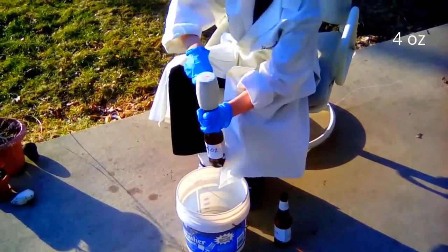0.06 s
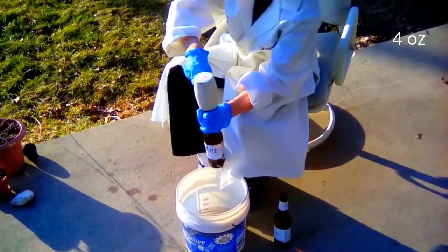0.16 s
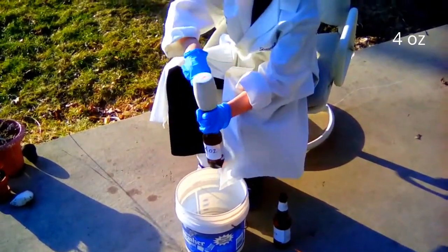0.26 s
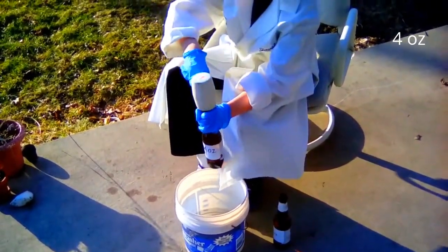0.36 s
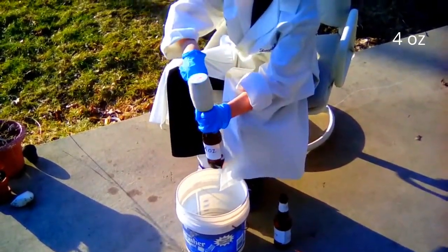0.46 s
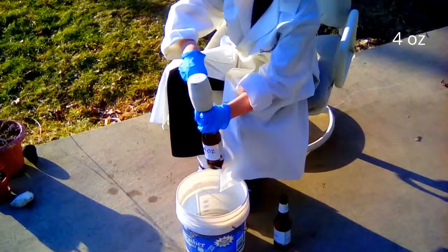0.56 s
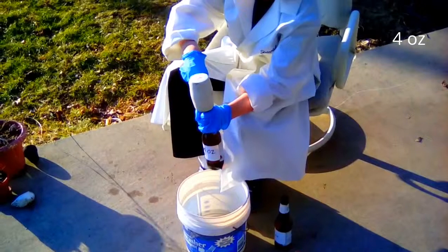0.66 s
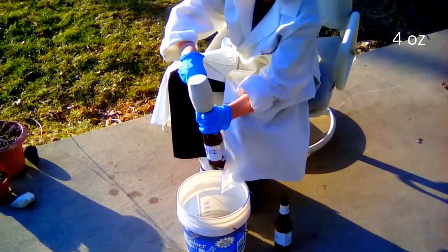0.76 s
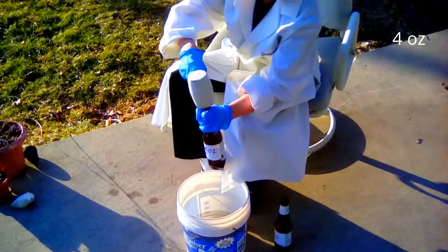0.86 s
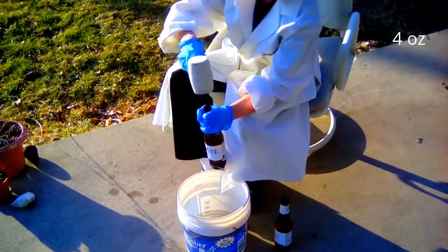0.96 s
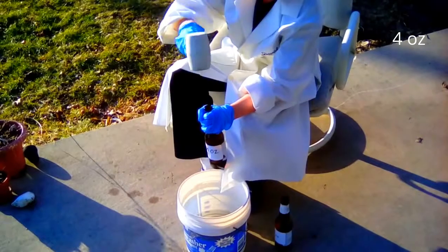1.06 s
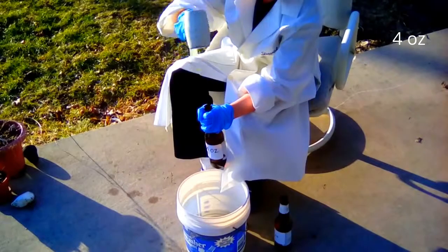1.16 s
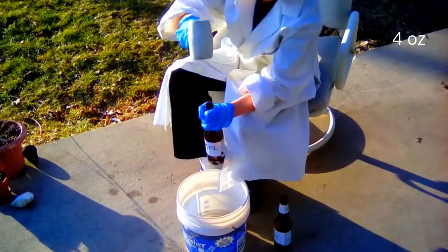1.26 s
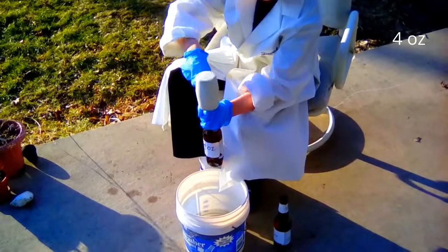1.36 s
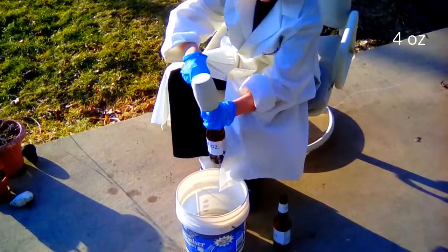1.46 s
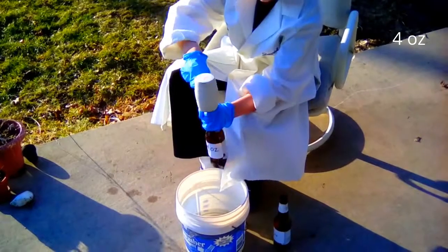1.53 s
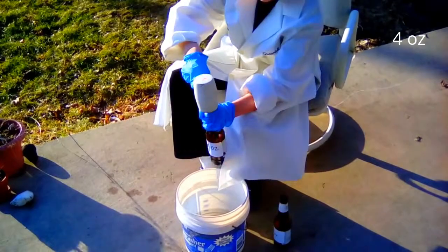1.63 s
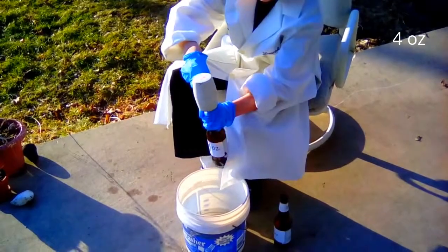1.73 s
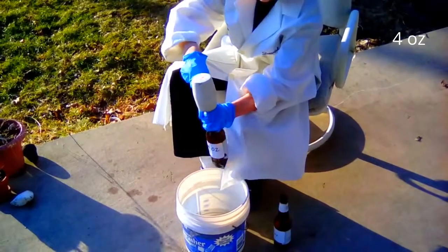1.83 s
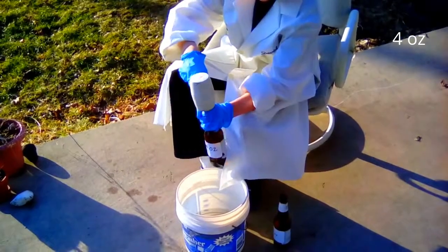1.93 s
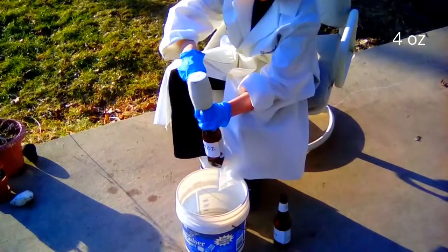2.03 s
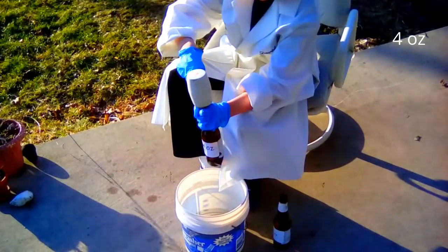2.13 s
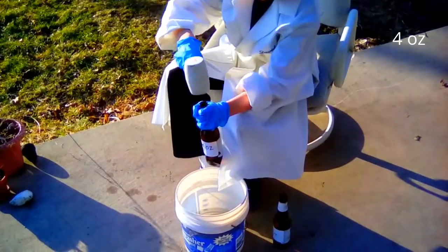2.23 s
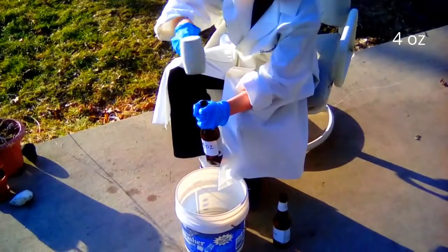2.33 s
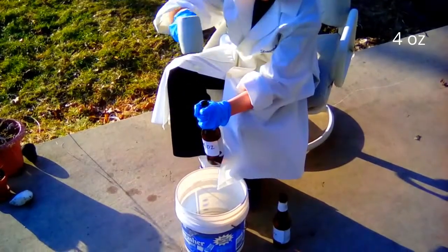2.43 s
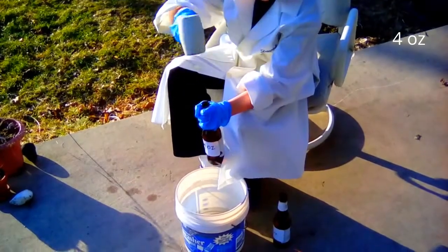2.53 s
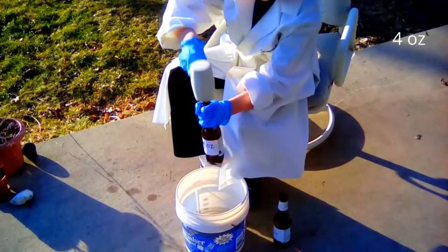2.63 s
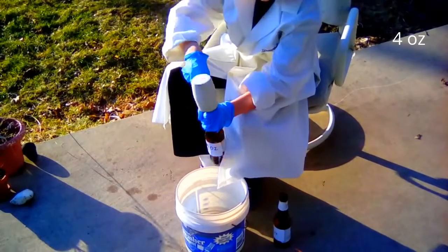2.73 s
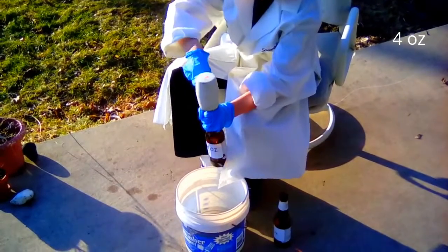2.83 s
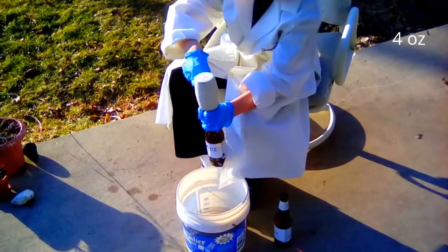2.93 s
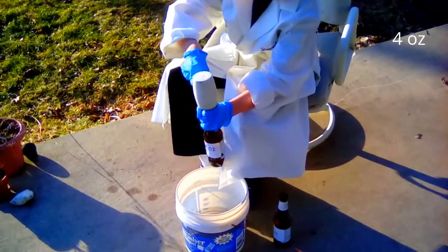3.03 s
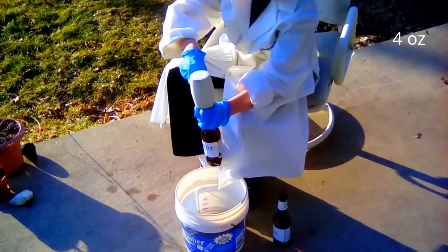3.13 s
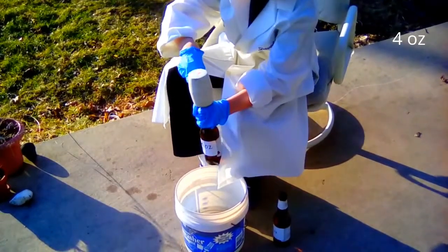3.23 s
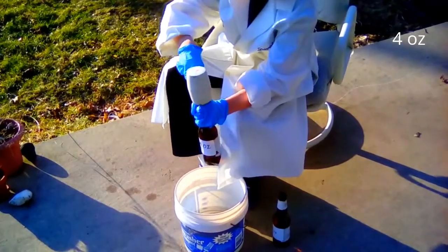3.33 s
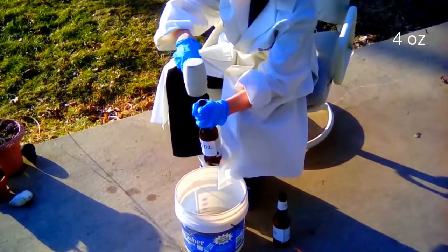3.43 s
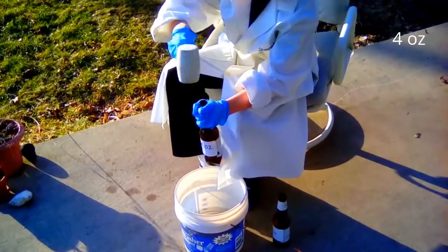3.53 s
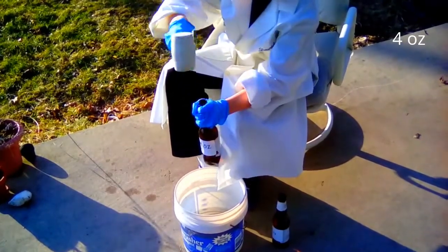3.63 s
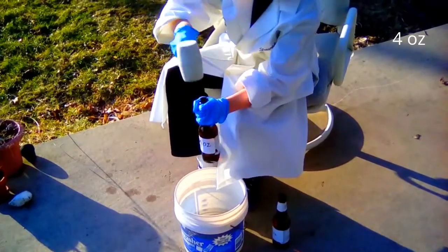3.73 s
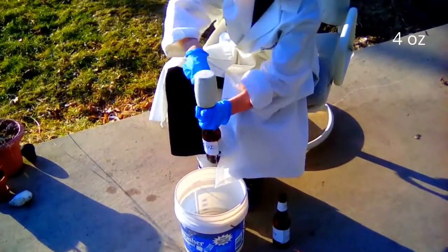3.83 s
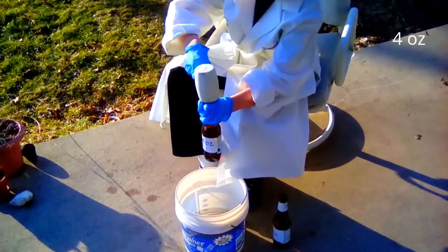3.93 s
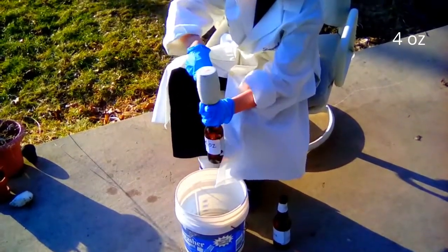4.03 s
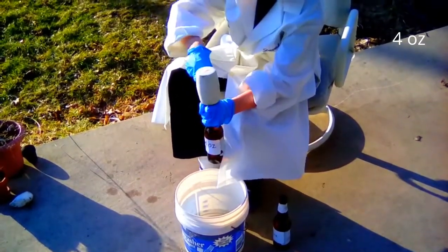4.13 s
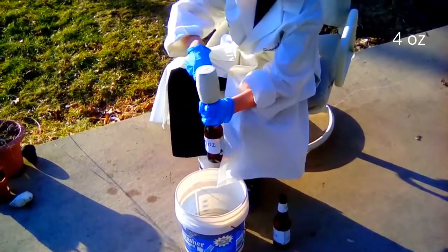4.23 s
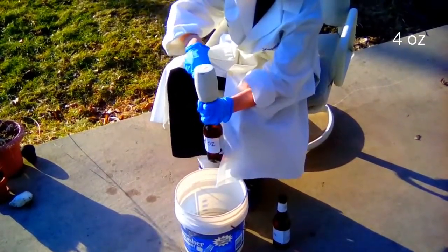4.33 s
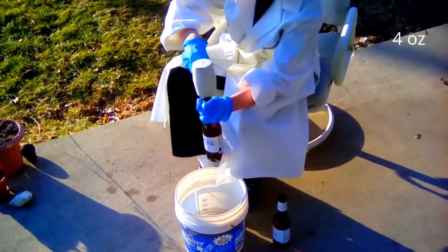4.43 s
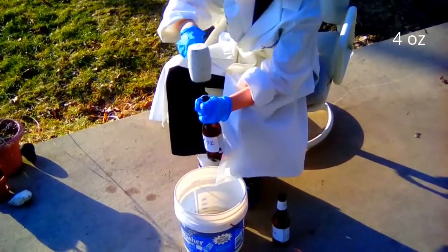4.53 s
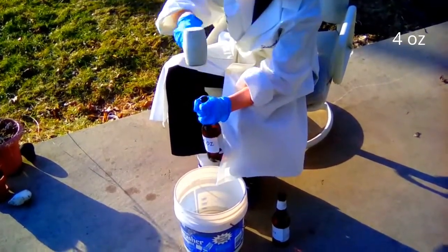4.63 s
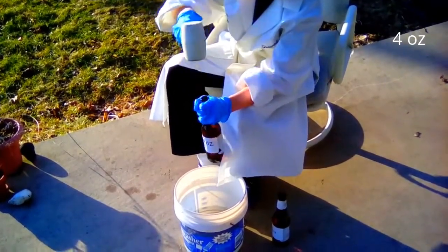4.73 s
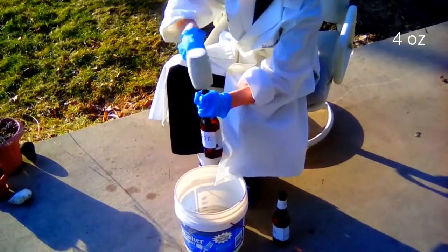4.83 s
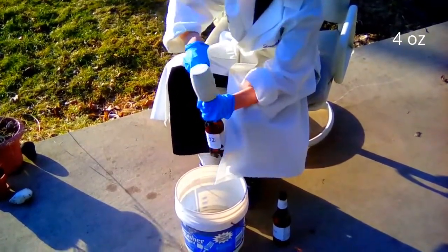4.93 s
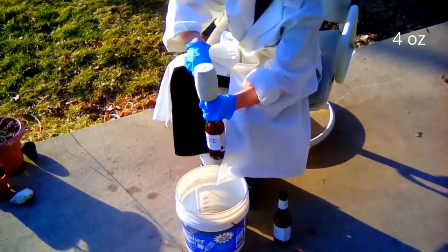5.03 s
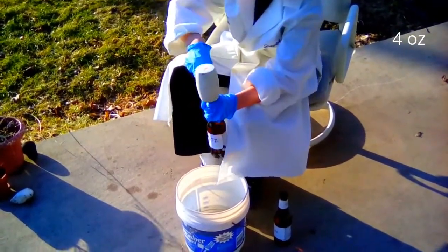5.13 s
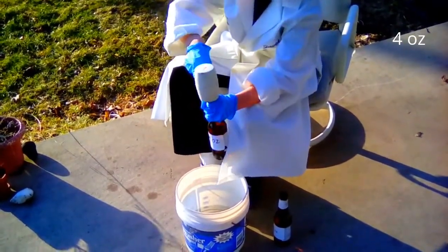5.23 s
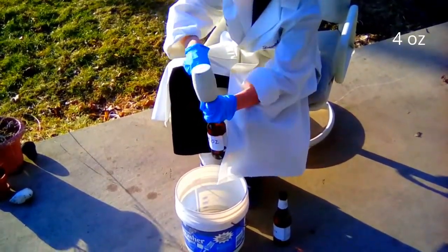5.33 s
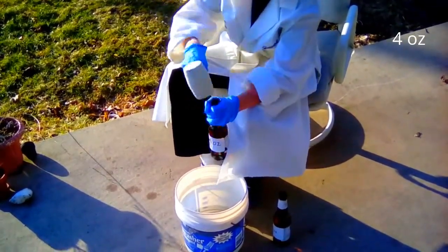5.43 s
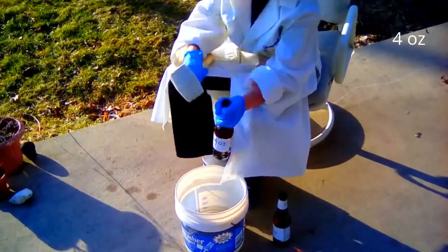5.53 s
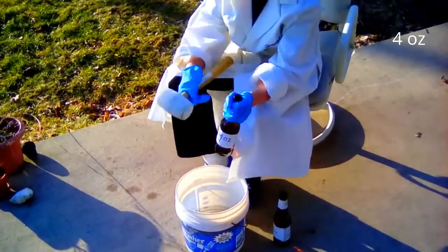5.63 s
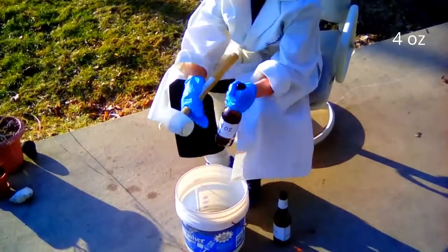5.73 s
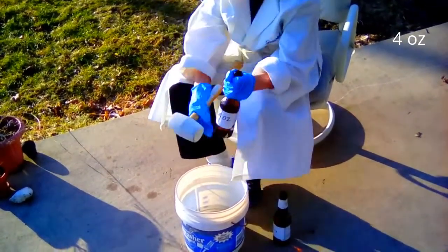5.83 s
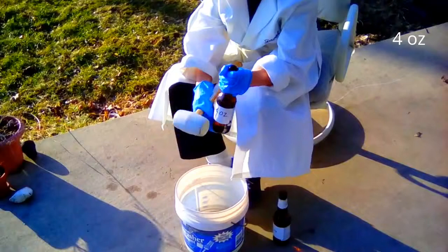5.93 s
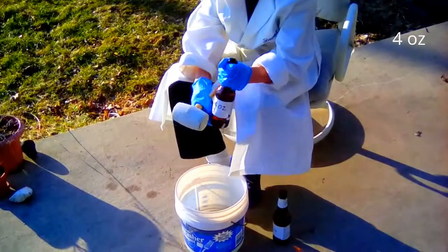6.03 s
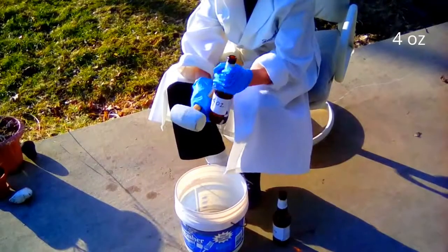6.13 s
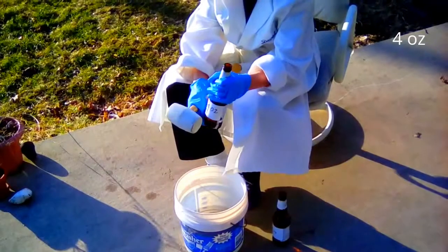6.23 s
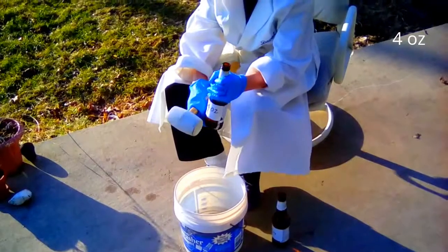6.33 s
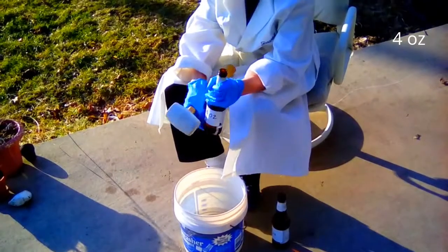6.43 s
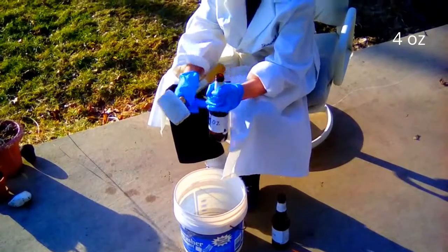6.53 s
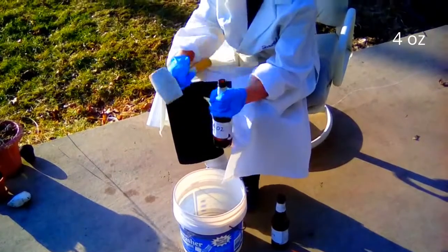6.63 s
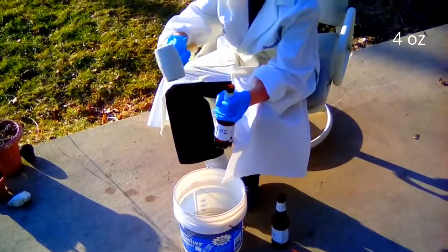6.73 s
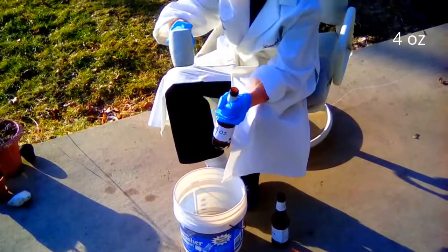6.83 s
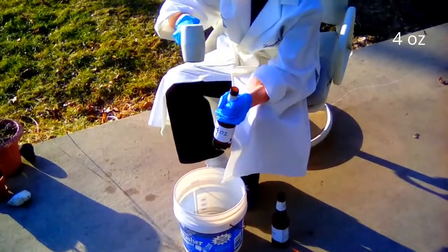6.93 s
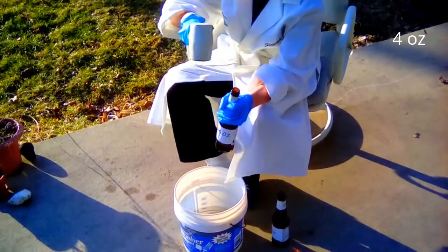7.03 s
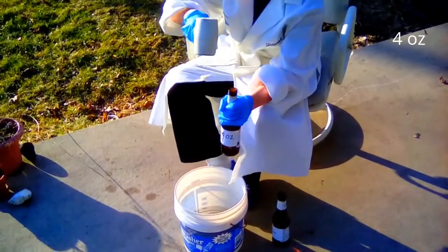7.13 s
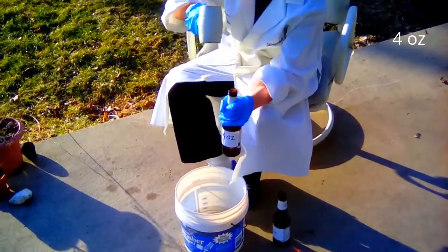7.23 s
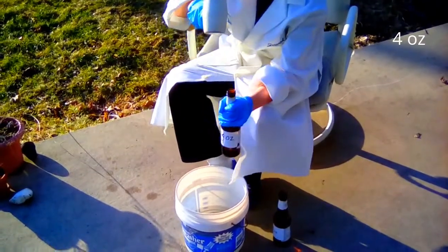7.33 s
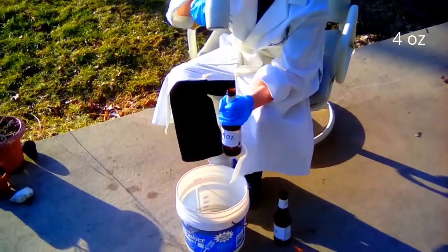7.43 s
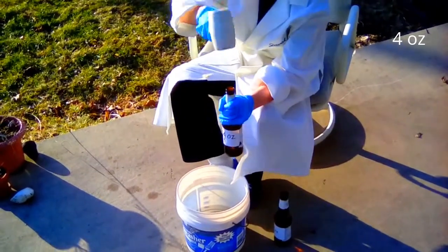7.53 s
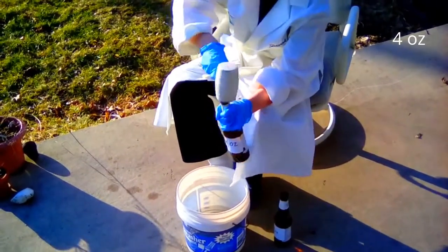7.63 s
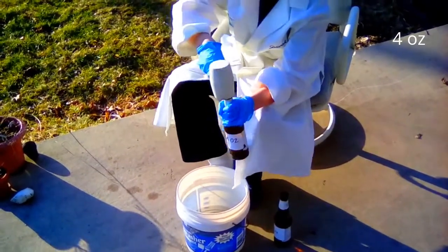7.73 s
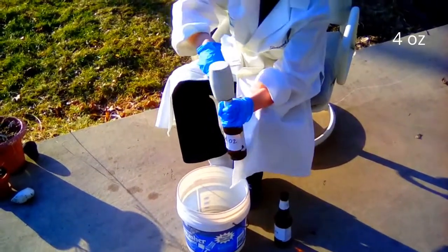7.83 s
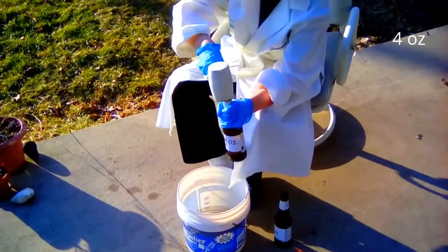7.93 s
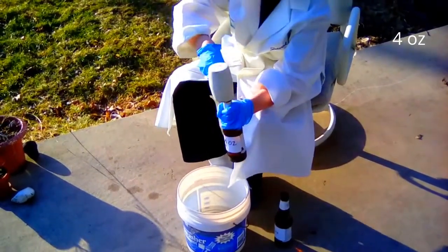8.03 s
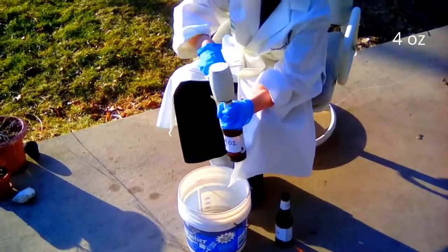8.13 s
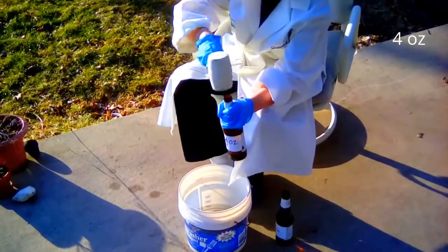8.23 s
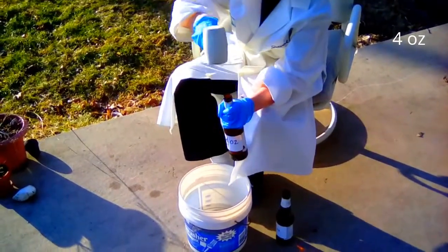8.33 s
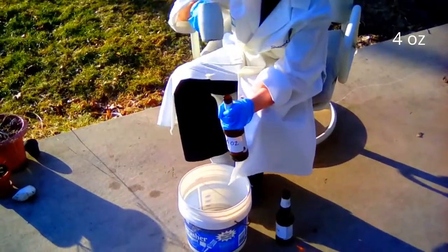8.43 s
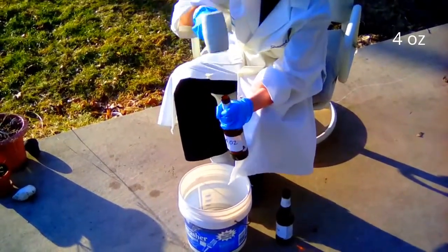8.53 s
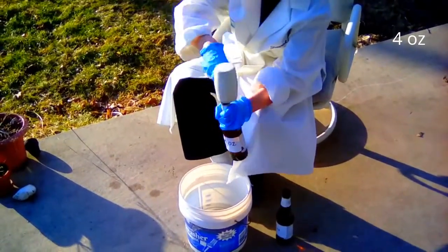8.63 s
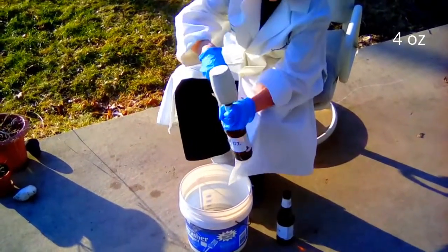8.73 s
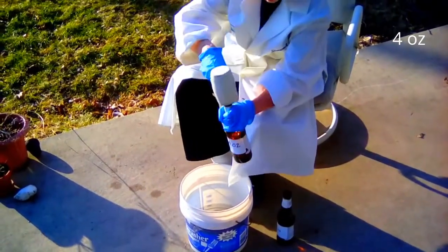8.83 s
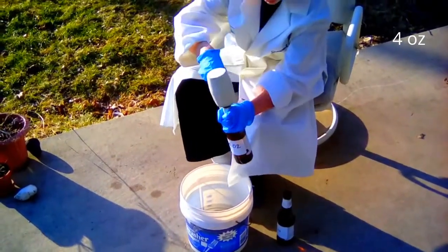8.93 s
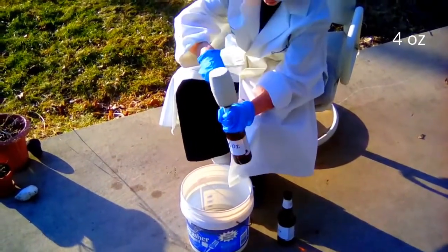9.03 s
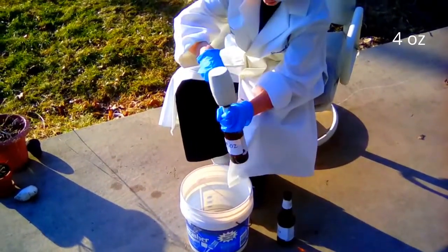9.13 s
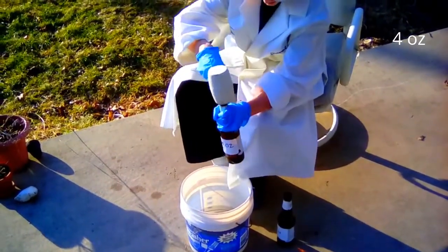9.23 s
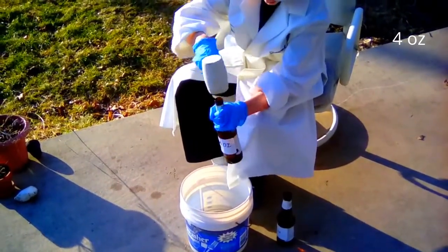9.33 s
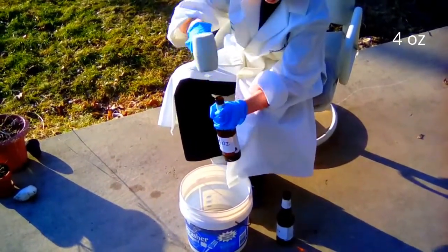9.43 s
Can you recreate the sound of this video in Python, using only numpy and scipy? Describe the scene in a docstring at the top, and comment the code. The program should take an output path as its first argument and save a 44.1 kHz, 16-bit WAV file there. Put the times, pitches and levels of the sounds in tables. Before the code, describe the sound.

Seven separate knocks of rubber on a partly filled glass bottle, five loud and two softer with a low airy hoot. The loud ones crack sharply and ring high for a fraction of a second, pitch wavering as water sloshes, with small tinkles after. One faint bird cheep comes early; quiet ticks and rustle fill the longer gap. Open yard with a close wall reflection, light wind buffeting the microphone, and constant soft hiss.

```python
"""On a patio, a rubber mallet knocks on the mouth of a hand-held glass bottle, partly filled with water.
Decaying sines make the thud, the ringing walls and the hoot of the air; bursts of noise make crack and splash.
Blurred gliding tones make the swinging main ring, small tinkles and one bird cheep; a house wall echoes the bottle.
Shaped noise makes the glove's rustle, the gusts that rumble on the microphone and the steady hiss."""
import sys
import numpy as np
from scipy import signal
from scipy.fft import rfft, irfft
from scipy.io import wavfile
from scipy.ndimage import map_coordinates

SR = 44100
rng = np.random.default_rng(int(sys.argv[2]) if len(sys.argv) > 2 else 0)


def dump_mix(stems):
    """Bounce the given channels to the path in sys.argv[1] as a 16-bit WAV at rate SR."""
    frames = np.atleast_2d(stems).T  # one column per channel
    limited = np.clip(frames, -1, 1)  # hard clip at full scale
    pcm = np.round(limited * 32767).astype(np.int16)
    wavfile.write(sys.argv[1], SR, pcm)


N = 417627
SHORT = SR // 2   # samples in each short sound: half a second
T = np.arange(SHORT) / SR   # its clock in seconds

# Levels in the tables are starting points: offsets in the code, the microphone and the yard come on top.
# Spectra are curves of relative level; t60 is the time to fall by 60 dB.


def from_db(db):
    """Gain of a level in dB."""
    return 10 ** (np.asarray(db) / 20)


def rms_one(x):
    """Scales a sound to unit rms."""
    return x / np.sqrt(np.mean(x ** 2) + 1e-20)


def in_time(rows):
    """Draws the columns of a table as straight lines between its times, sample by sample."""
    s, *columns = np.transpose(rows)
    return [np.interp(np.arange(N) / SR, s, column) for column in columns]


def coloured(spectrum, size):
    """White noise filtered to a spectrum drawn over log frequency; rms 1."""
    hz, db = np.transpose(spectrum)
    grid = np.maximum(np.arange(size // 2 + 1) * SR / size, 1)
    gain = from_db(np.interp(np.log(grid), np.log(hz), db))
    return rms_one(irfft(rfft(rng.standard_normal(size)) * gain, size))


def drift(rate):
    """Slow random curve of spread 1: noise through two equal low-passes at the rate in Hz."""
    r = np.exp(-2 * np.pi * rate / SR)
    white = rng.standard_normal(N + SR)
    return rms_one(signal.lfilter([1], [1, -2 * r, r * r], white)[SR:])


def wobble(rate, t):
    """Smooth random curve of spread about 1, through a new value 'rate' times a second."""
    return map_coordinates(rng.standard_normal(120), [np.clip(t * rate, 0, 119)])


def dying(t60, lag=0.):
    """Half a second of exponential decay that starts after a lag."""
    t = T - lag
    return (t >= 0) * from_db(-60 * np.maximum(t, 0) / t60)


# Moving water bends the modes: share of pitch, new values per second, seconds to build up
SLOSH_SHARE, SLOSH_RATE, SLOSH_RISE_S = 0.032, 120, 0.048


def modes(table, lag=0., swell=1e-4, slosh=0):
    """Decaying sines that rise over the swell time; with slosh each wanders more and more in pitch."""
    t = np.maximum(T - lag, 0)
    rise = 1 - np.exp(-t / max(swell, 1e-4))
    depth = slosh * np.minimum(t / SLOSH_RISE_S, 1)
    out = 0
    for hz, db, t60 in table:
        clock = t + SLOSH_SHARE * np.cumsum(depth * wobble(SLOSH_RATE, t)) / SR
        out = out + from_db(db) * rise * dying(t60, lag) * np.sin(2 * np.pi * hz * clock)
    return out


def blurred(hz, share, width_hz):
    """A tone that follows a pitch curve; the noisy share spreads it into a band; height about 1."""
    t, share = np.arange(len(hz)) / SR, np.clip(share, 0, 1)
    carrier = np.exp(2j * np.pi * np.cumsum(hz) / SR)
    noise = (wobble(2 * width_hz, t) + 1j * wobble(2 * width_hz, t)) / np.sqrt(2)
    return np.imag(carrier * (np.sqrt(1 - share) + np.sqrt(share) * noise))


def add(out, s, sound):
    """Mixes a sound in at a time in seconds."""
    at = round(s * SR)
    out[at:at + len(sound)] += sound[:N - at]


# Wind strength. Each row: time in seconds, lowest hollow tone, higher hollow tones, low rumble, all in dB.
GUST_CURVE = [(0.0, -73, -77, -68.5), (.3, -70.5, -82, -62.5), (.5, -70, -69.5, -63),
              (.64, -71, -70, -64.5), (.84, -78, -92, -62.5), (1.08, -68, -75, -61.5),
              (1.27, -59.5, -71, -59.5), (1.42, -63, -74, -61), (1.66, -73, -85.5, -65),
              (1.97, -76, -81.5, -62), (2.19, -67, -75, -64), (2.34, -63, -79.5, -62),
              (2.6, -81.5, -83.5, -68.5), (3.38, -76, -85, -69), (3.52, -75, -76, -63.5),
              (3.8, -83, -87.5, -68.5), (4.17, -76.5, -80.5, -71), (4.67, -83.5, -86, -64),
              (5.1, -74.5, -80, -64), (5.43, -82.5, -93, -72.5), (5.8, -78, -82.5, -65.5),
              (6.1, -66.5, -78, -62), (6.36, -82.5, -91, -68.5), (6.96, -73.5, -82, -66.5),
              (7.17, -76.5, -82, -71.5), (7.42, -74, -83.5, -67), (8.1, -83, -88, -66),
              (9.1, -92, -95, -71.5), (9.47, -80.5, -89, -63.5)]
# Tone of the rumble. Each row: frequency in Hz, level in dB.
RUMBLE_SPECTRUM = [(12, -63), (20, -21.5), (32, -12), (57, -11), (139, 3.5), (211, -6), (271, -17.5),
                   (300, -13.5), (390, -29), (660, -120)]
# Deep puffs on the microphone. Each row: loudest moment in seconds, level in dB.
PUFFS = [(.76, -69), (1.469, -60.5), (2.02, -71), (3.68, -67), (4.85, -71), (5.1, -64), (7.05, -68.5)]
# Tone of the puffs. Each row: frequency in Hz, level in dB.
PUFF_SPECTRUM = [(15, -31.5), (35, -5.5), (60, -5.5), (90, -1.5), (150, -37), (400, -120)]
PUFF_HALF_S = 0.085   # level falls to 1/e this far from the middle
# Wind sings in a hollow, lowest tone first. Each row: frequency in Hz, filter width in Hz, offset in dB.
HOLLOW_TONES = [(263.1, 46.5, 2.5), (384.3, 77, 1), (511.6, 42, -8), (410, 150, -13.5)]


def wind():
    """Lumpy low rumble, deep puffs, and gust noise through the resonances of a hollow, each fluttering alone."""
    lowest_db, higher_db, rumble_db = in_time(GUST_CURVE)
    lumps = from_db(1.9 * drift(18) + 2.2 * drift(4))
    out = from_db(rumble_db) * rms_one(coloured(RUMBLE_SPECTRUM, N) * lumps)
    puff_level = sum(from_db(db) * np.exp(-((np.arange(N) / SR - s) / PUFF_HALF_S) ** 2) for s, db in PUFFS)
    out += puff_level * coloured(PUFF_SPECTRUM, N)
    white = rng.standard_normal(N)
    for k, (hz, width, offset_db) in enumerate(HOLLOW_TONES):
        peak = signal.iirpeak(hz, hz / width, fs=SR)
        tone = rms_one(signal.lfilter(*peak, signal.lfilter(*peak, white)))   # two passes, a narrower peak
        gust_db = higher_db if k else lowest_db
        out += from_db(gust_db + offset_db + 2.4 * drift(8)) * tone
    return out


# Tone of the hiss. Each row: frequency in Hz, level in dB.
HISS_SPECTRUM = [(260, -25), (450, -3), (508, -6), (734, -5.5), (799, -6.5), (1260, -8.5), (1970, -8),
                 (3910, -9), (5380, -6), (8350, -29.5), (10900, -55), (18400, -120)]
# Brighter streaks, perhaps far insects. Each row: frequency in Hz, width in Hz, level against the hiss in dB.
HISS_STREAKS = [(5660, 180, -9), (6357, 360, -11.5)]
HISS_DB = -79


def hiss():
    """Far leaves and traffic: one noise split in pitch, and narrow streaks, each flickering a little."""
    noise = coloured(HISS_SPECTRUM, N)
    low = signal.sosfiltfilt(signal.butter(2, 4200, fs=SR, output="sos"), noise)
    out = low * from_db(0.51 * drift(1.3)) + (noise - low) * from_db(1.4 * drift(3.6))
    for hz, width, db in HISS_STREAKS:
        streak = signal.lfilter(*signal.iirpeak(hz, hz / width, fs=SR), rng.standard_normal(N))
        out += from_db(db + 2.8 * drift(5)) * rms_one(streak)
    return from_db(HISS_DB) * out


# Mallet head. Each row: frequency in Hz, level in dB, t60 in seconds.
THUD_MODES = [(618.8, -4.5, 0.015), (701, -0.5, 0.015), (830, -9, .025), (890, -8.5, 0.032),
              (963, -2, 0.022)]


def thud(db):
    """The rubber touches, pushes, then bottoms out and pushes again."""
    touch = from_db(db - 10) * modes([(1650, 2, 0.0054), (4230, -2.0, 0.0027)])
    first = from_db(db - 5) * modes(THUD_MODES, lag=0.00042, swell=0.0003)
    second = from_db(db + 0.5) * modes(THUD_MODES, lag=0.001902, swell=0.00078)
    return touch - first - second


# Gripped neck. Each row: frequency in Hz, level in dB, t60 in seconds.
NECK_MODES = [(1448, -1.5, 0.035), (2006, 4.5, .02)]


def neck(db):
    """The gripped neck gives a short, heavily damped knock."""
    return -from_db(db) * modes(NECK_MODES, swell=0.0013)


def push(db):
    """Hand and bottle are driven down: one low mode, 288 Hz with a t60 of 0.05 s."""
    return from_db(db) * modes([(288, 0, .05)], lag=0.0012, swell=0.00031)


# The cupped glove slaps with the air. One row: frequency in Hz, level against the air in dB, t60 in seconds.
PALM_MODE = (465, -5.5, 0.038)
AIR_HZ, AIR_T60_S = 209.3, 0.22


def air(db):
    """The palm slaps, then the air above the water hoots through the open neck."""
    slap = modes([PALM_MODE], lag=.002, swell=0.00081)
    hoot = modes([(AIR_HZ, 0, AIR_T60_S)], lag=0.0041, swell=0.0046)
    return from_db(db) * (slap + hoot)


GLASS_LAG_S = 0.0023   # glass is reached once the rubber is squeezed flat
# Low wall mode. One row: frequency in Hz, level in dB, t60 in seconds.
LOW_MODE = (2160, 0, 0.15)
# Side wall mode. One row: frequency in Hz, level in dB, t60 in seconds.
SIDE_MODE = (2975, 7, 0.05)
# Upper ring. Each row: ratio to the upper pitch, level in dB, t60 in seconds.
UPPER_MODES = [(1, 5.5, 0.043), (.95, -4.5, 0.11), (.91, -9.5, .08), (1.05, -9, 0.069)]
# Rough tail of the upper ring. One row: ratio to the upper pitch, level in dB, t60 in seconds, width in Hz.
UPPER_TAIL = (1.02, -28.5, .5, 119)
# Top ring. Each row: frequency in Hz, level in dB, t60 in seconds.
TOP_MODES = [(5890, 5, 0.021), (6335, 3.5, 0.062), (6590, -13, 0.043), (7380, -3, 0.026)]


def walls(low_db, side_db, upper_db, upper_hz, top_db):
    """The glass walls ring in several modes, their pitch bent by the moving water."""
    upper = [(ratio * upper_hz, db, t60) for ratio, db, t60 in UPPER_MODES]
    out = from_db(low_db) * modes([LOW_MODE], GLASS_LAG_S, swell=.002, slosh=1)
    out += from_db(side_db) * modes([SIDE_MODE], GLASS_LAG_S, swell=0.00019, slosh=0.95)
    out += from_db(upper_db) * modes(upper, GLASS_LAG_S, swell=0.00046, slosh=0.25)
    out += from_db(top_db) * modes(TOP_MODES, GLASS_LAG_S, swell=0.00029, slosh=1)
    ratio, tail_db, tail_t60, width_hz = UPPER_TAIL
    rough = blurred(np.full(SHORT, ratio * upper_hz), 0.94, width_hz)
    return out + from_db(upper_db + tail_db) * dying(tail_t60, GLASS_LAG_S) * rough


# Crack of the glass. Each row: frequency in Hz, level in dB.
CRACK_SPECTRUM = [(500, -7), (1500, -19), (3000, -4), (5000, -12.5), (6500, 0.5), (8000, -15),
                  (11000, -28.5), (16000, -30.5)]
# Highest part of the crack. Each row: frequency in Hz, level in dB.
SNAP_SPECTRUM = [(8000, -26.5), (10500, -2.5), (13000, -2), (16000, -13)]
# Water thrown up the walls. Each row: frequency in Hz, level in dB.
SPLASH_SPECTRUM = [(500, -26.5), (1200, -12), (2800, 2), (4000, -1), (4700, -6.5), (6200, 0), (7500, -17.5),
                   (12000, -42.5)]
CRACK_T60_S, SNAP_T60_S, SPLASH_T60_S = 0.022, 0.048, 0.28
SPLASH_DB = -32   # against the crack


def crack(crack_db, snap_db):
    """Glass cracks in bursts of noise; water thrown up the walls hisses on after it."""
    out = from_db(crack_db) * dying(CRACK_T60_S, GLASS_LAG_S) * coloured(CRACK_SPECTRUM, SHORT)
    out += from_db(snap_db + 7) * dying(SNAP_T60_S, GLASS_LAG_S) * coloured(SNAP_SPECTRUM, SHORT)
    out += from_db(crack_db + SPLASH_DB) * dying(SPLASH_T60_S) * coloured(SPLASH_SPECTRUM, SHORT)
    return out * np.clip((T - GLASS_LAG_S) / 0.00013, 0, 1)   # opens quickly after the lag


# Mallet blows. Each row: start in seconds, thud, neck, push, air, low wall ring, side wall ring and
# upper ring in dB, upper ring pitch in Hz, top ring, crack and snap in dB.
MALLET_BLOWS = [(0.043, -38, -45.5, -33, -37, -70, -65, -60.5, 3920, -77, -59.5, -93),
                (1.549, -23, -33.5, -33, -56.5, -44, -36, -41.5, 3820, -47, -23, -50.5),
                (2.836, -24, -35, -29, -53, -44, -36, -34, 3980, -31.5, -25, -53.5),
                (4.001, -26, -42, -30, -52.5, -46, -40, -36.5, 3830, -32.5, -26.5, -54.5),
                (5.066, -33.5, -48.5, -32, -36.5, -60, -67, -48.5, 3876, -55, -39.5, -67),
                (7.802, -22.5, -32, -32, -39, -47.5, -46, -35.5, 3890, -30, -23, -58.5),
                (8.816, -21.5, -27, -33, -55.5, -46, -41, -41, 3880, -43, -22.5, -45.5)]


def bottle():
    """Rubber thuds first; the glass cracks and rings a moment later, the air inside hoots."""
    out = np.zeros(N)
    for (s, thud_db, neck_db, push_db, air_db, low_db, side_db,
         upper_db, upper_hz, top_db, crack_db, snap_db) in MALLET_BLOWS:
        blow = thud(thud_db) + neck(neck_db) + push(push_db) + air(air_db)
        blow += walls(low_db, side_db, upper_db, upper_hz, top_db)
        blow += crack(crack_db, snap_db)
        add(out, s, blow)
    return out


# Walls nearby. Each row: delay in seconds, level in dB.
WALL_ECHOES = [(0.0182, -10), (0.025, -25.5), (0.043, -33.5)]
# Scattered tail, near and far. Each row: level in dB, t60 in seconds.
YARD_TAIL = [(-39, 0.12), (-62, 0.81)]
WALL_DULL_HZ, SCATTER_LOW_HZ = 4500, 470


def yard(x):
    """A few dull wall echoes and a scattered tail, thin in the bass, that dies in two stages."""
    echoes = np.zeros(SHORT)
    for s, db in WALL_ECHOES:
        echoes[round(s * SR)] += from_db(db)
    fall = sum(from_db(db) * dying(t60, lag=0.0035) for db, t60 in YARD_TAIL)
    scatter = rng.standard_normal(SHORT) * fall
    response = signal.lfilter(*signal.butter(1, WALL_DULL_HZ, fs=SR), echoes)
    response += signal.lfilter(*signal.butter(1, SCATTER_LOW_HZ, "high", fs=SR), scatter)
    response[0] = 1   # the direct sound
    return signal.fftconvolve(x, response)[:N]


# Glass and water at and after the blows. Each row: start in seconds, level in dB, first pitch in Hz,
# end pitch in Hz, t60 in seconds, noisy share from 0 to 1.
TINKLE_NOTES = [(0.045, -46.5, 4280, 4420, 0.092, 0.16), (0.391, -51, 2746, 2775, 0.14, 0.6),
                (0.411, -68, 3930, 4100, 0.11, 0), (.485, -73, 1030, 1030, .08, 0.1),
                (.49, -71, 5120, 5050, .2, .8), (1.648, -47.5, 2143, 2080, 0.1, 0.1),
                (1.649, -46.5, 2990, 2950, 0.065, 0.6), (1.65, -56.5, 6430, 6300, 0.065, 0.96),
                (1.87, -66, 6300, 6260, 0.12, .5), (3.16, -64, 6200, 6040, 0.15, 0.4),
                (3.222, -76, 2846, 2820, 0.13, .3), (4.302, -65, 1170, 1290, 0.17, 0.55),
                (4.312, -71, 2930, 2790, 0.31, .9), (4.322, -78.5, 2060, 2470, 0.69, .7),
                (5.169, -67.5, 1334, 1330, 0.1, .1), (5.17, -71, 2100, 2080, 0.13, .7),
                (5.169, -61.5, 2794, 2750, 0.11, .4), (5.41, -64.5, 2830, 2800, 0.094, 0.85),
                (7.157, -67, 2780, 2820, .04, .5), (8.148, -65.5, 2970, 2910, 0.3, 0.92),
                (8.251, -73.5, 1645, 1530, 0.29, .7), (8.256, -74, 2430, 2580, 0.19, 0.8),
                (8.369, -78, 1480, 1410, 0.38, .7), (8.858, -45, 2155, 2110, 0.081, .6),
                (9.019, -51, 2840, 2740, 0.091, 0.4), (9.021, -75.5, 3950, 3870, 0.23, 1),
                (9.121, -63, 2770, 2830, 0.11, 0.4), (9.138, -68.5, 1290, 1250, 0.14, .05),
                (9.135, -68, 2060, 2085, .15, .6), (9.141, -61, 2870, 2590, 0.22, 0.7)]
TINKLE_BLUR_HZ, TINKLE_GLIDE_S = 100, 0.051


def tinkles():
    """Short rings that glide in pitch, from clean to noisy."""
    out = np.zeros(N)
    for s, db, hz, end_hz, t60, share in TINKLE_NOTES:
        pitch = np.interp(T, [0, TINKLE_GLIDE_S], [hz, end_hz])
        tone = blurred(pitch, share, TINKLE_BLUR_HZ)
        add(out, s, from_db(db) * (1 - np.exp(-T / 0.00061)) * dying(t60) * tone)
    return out


# Gloved fingers and rubber on the glass. Each row: start in seconds, level in dB.
GLASS_TICKS = [(0.3915, -67), (0.409, -73), (5.168, -66), (6.18, -64), (6.424, -64.5), (6.596, -64),
               (6.6455, -76)]
TICK_HZ, TICK_T60_S = 3340, 0.041


def ticks():
    """Dry ticks: decaying noise around the wall resonance."""
    out = np.zeros(N)
    band = [(TICK_HZ / 3, -20), (TICK_HZ, 0), (TICK_HZ * 1.23, -22), (TICK_HZ * 4, -60)]
    for s, db in GLASS_TICKS:
        add(out, s, from_db(db) * coloured(band, SHORT) * dying(TICK_T60_S))
    return out


CHEEP_S, CHEEP_DB, CHEEP_LOW_HZ, CHEEP_HIGH_HZ = .77, -64, 6360, 7350
CHEEP_RISE_S, CHEEP_T60_S, CHEEP_NOISY_SHARE, CHEEP_BLUR_HZ = .014, .2, .3, 120


def bird():
    """One slightly rough note that slides up in pitch as it swells, then fades."""
    out = np.zeros(N)
    rise = 1 - np.exp(-T / CHEEP_RISE_S)
    pitch = CHEEP_LOW_HZ + (CHEEP_HIGH_HZ - CHEEP_LOW_HZ) * rise
    tone = blurred(pitch, CHEEP_NOISY_SHARE, CHEEP_BLUR_HZ)
    add(out, CHEEP_S, from_db(CHEEP_DB) * rise * dying(CHEEP_T60_S) * tone)
    return out


# Main wall ring after each firm blow, damped by the grip, then a weak tail. Each row: start in seconds,
# level in dB, swell in seconds, t60 in seconds, resting pitch in Hz, water swing in Hz before its fade, tail in dB.
MAIN_RINGS = [(1.566, -42.5, 0.013, 0.21, 2772, 169, -75.5), (2.84, -27, .008, .15, 2755, 44, -59),
              (4.006, -40, 0.016, 0.22, 2793, 154, -74), (5.072, -45, .012, .16, 2750, 58, -82),
              (7.807, -25, .018, .12, 2720, 84, -63), (8.819, -21.5, .014, 0.11, 2770, 50, -73)]
RING_TAIL_T60_S = 1
RING_BLUR_S, RING_BLUR_HZ = 0.1, 130   # time for the clean tone to become a band of noise, its width
SWING_PERIOD_S, SWING_FADE_S = .125, .12   # fade to 1/e


def wall_ring():
    """The strongest wall mode swells and dies in two stages; clean at first, rough as the water splashes."""
    out = np.zeros(N)
    # water climbs the wall and lowers the pitch, falls back and raises it
    swing = np.sin(2 * np.pi * T / SWING_PERIOD_S) * np.exp(-T / SWING_FADE_S)
    for s, db, swell, t60, rest_hz, swing_hz, tail_db in MAIN_RINGS:
        level = from_db(db) * dying(t60) + from_db(tail_db) * dying(RING_TAIL_T60_S)
        tone = blurred(rest_hz - swing_hz * swing, (T / RING_BLUR_S) ** 2, RING_BLUR_HZ)
        add(out, s, np.minimum(T / swell, 1) * level * tone)
    return out


# Sleeve and glove on the bottle. Each row: frequency in Hz, level in dB.
CLOTH_SPECTRUM = [(200, -16), (450, 6), (800, -13), (1700, -9), (3000, -34.5)]
RUSTLE_S, RUSTLE_RISE_S, RUSTLE_FALL_S = 6.09, 0.5, 0.12   # loudest moment, rise before it, fall after it
RUSTLE_DB, RUSTLE_LUMPS_DB = -75, 0.5


def rustle():
    """Sleeve and glove shift on the bottle: uneven soft noise that grows and ebbs while the grip changes."""
    shape = np.interp(np.arange(N) / SR - RUSTLE_S, [-RUSTLE_RISE_S, 0, RUSTLE_FALL_S], [0, 1, 0])
    level = from_db(RUSTLE_DB + RUSTLE_LUMPS_DB * drift(30))
    return shape * level * coloured(CLOTH_SPECTRUM, N)


MIC_LOW_HZ, MIC_HIGH_HZ = 134, 7600


def scene():
    """Bottle in the yard, bird and rustle through a microphone weak in bass and top, over wind and hiss."""
    near = yard(bottle() + wall_ring() + tinkles() + ticks()) + bird() + rustle()
    microphone = signal.butter(2, [MIC_LOW_HZ, MIC_HIGH_HZ], "band", fs=SR, output="sos")
    return (signal.sosfilt(microphone, near) + wind() + hiss())[None]


SELF_NOISE_DB = -89   # white noise of the amplifier, before the top is cut
STOP_HZ = 16065   # from here up everything is at least 40 dB down


def record(dry):
    """The amplifier adds its noise, the top is cut."""
    noisy = dry + from_db(SELF_NOISE_DB) * rng.standard_normal(dry.shape)
    return signal.sosfilt(signal.cheby2(12, 40, STOP_HZ, fs=SR, output="sos"), noisy)


dry = scene()
out = record(dry)
dump_mix(out)
```